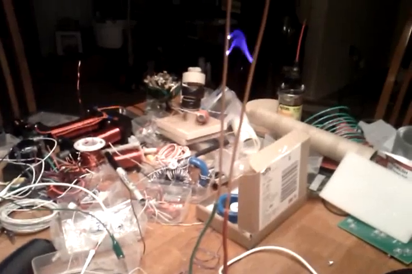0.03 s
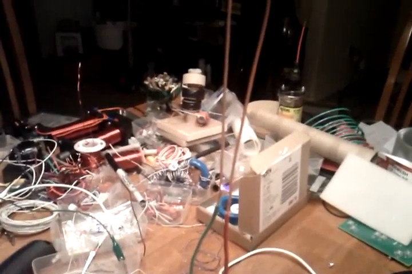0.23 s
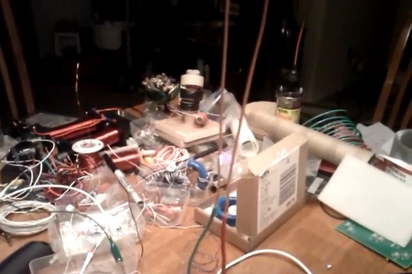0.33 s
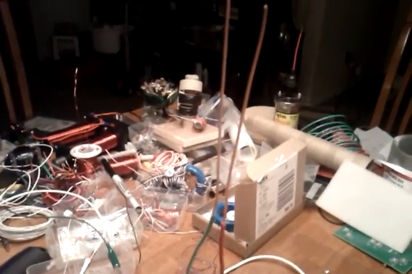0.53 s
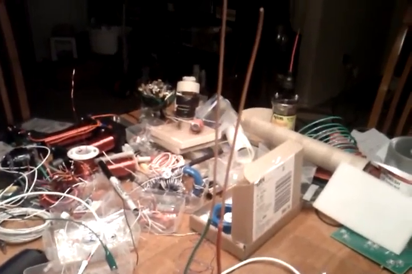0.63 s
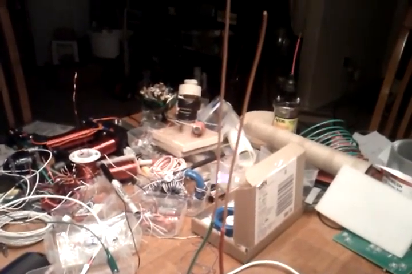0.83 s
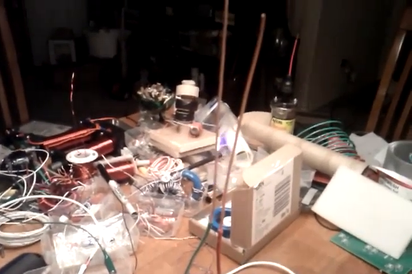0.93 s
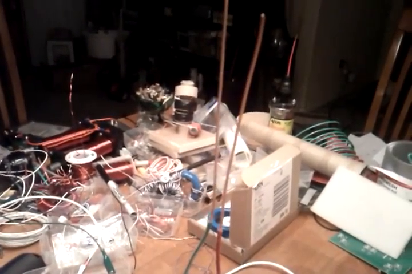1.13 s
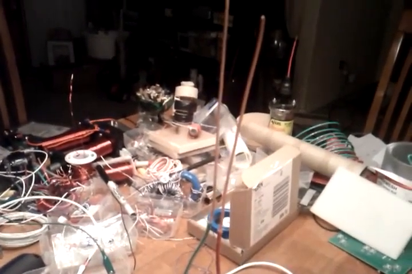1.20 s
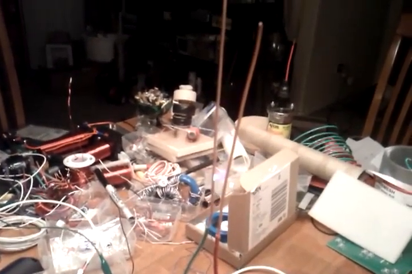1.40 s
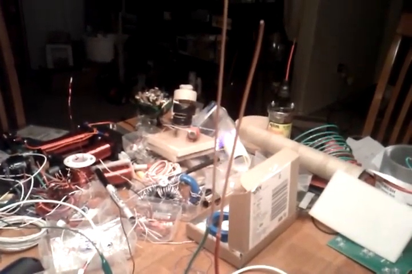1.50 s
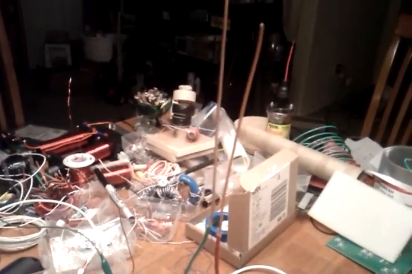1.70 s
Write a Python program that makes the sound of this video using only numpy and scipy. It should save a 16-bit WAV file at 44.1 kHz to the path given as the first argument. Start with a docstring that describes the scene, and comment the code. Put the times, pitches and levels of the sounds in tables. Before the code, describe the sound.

An electric arc between metal rods hisses and buzzes in four short bursts. Each swells and breaks off with a crack or sputter, then a loud snap restarts it. Faint hum lies underneath, in a small room.

```python
"""Climbing high-voltage arc

An arc climbs two diverging rods on a workbench, again and again. It strikes with a snap, hisses and
buzzes at twice the mains rate, flares and cracks as it tears off at the top, and strikes anew.
The supply hums throughout; bench clutter and a small room echo the snaps."""
import sys
import numpy as np
from scipy import signal
from scipy.fft import rfft, irfft
from scipy.io import wavfile
from scipy.ndimage import uniform_filter1d

SR = 44100
rng = np.random.default_rng(int(sys.argv[2]) if len(sys.argv) > 2 else 0)


def wav_out(sig):
    """Save sig, one row per channel (or a flat mono array), as 16-bit PCM at SR to the path in sys.argv[1]."""
    wavfile.write(sys.argv[1], SR, np.round(np.clip(np.atleast_2d(sig).T, -1, 1) * 32767).astype(np.int16))


N = 77175
BUZZ_HZ = 120.3  # twice mains
SCATTER_T60_S = 0.045
# arc burns: (strike [s], break [s], base hiss [dB], flare before break [dB])
BURNS = [(-.12, 0.215, -41, 13), (0.386, 0.676, -44, 9), (0.909, 1.259, -44.5, 9), (1.454, 1.892, -45, 17)]


def undb(db):
    """dB to amplitude."""
    return 10 ** (np.asarray(db) / 20)


def unit(x):
    """Scale to rms 1."""
    return x / np.sqrt(np.mean(x ** 2))


def colour(x, spectrum):
    """Filter by (frequency [Hz], gain [dB]) points."""
    hz, db = np.array(spectrum).T
    bins_hz = np.maximum(np.fft.rfftfreq(2 * N, 1 / SR), 1)
    gain = undb(np.interp(np.log(bins_hz), np.log(hz), db))
    return irfft(rfft(x, 2 * N) * gain)[:N]


def walk(rate_hz):
    """Smooth random drift, rms 1."""
    width = max(int(SR / rate_hz), 1)
    drift = uniform_filter1d(rng.standard_normal(N), width, mode="wrap")
    return unit(uniform_filter1d(drift, width, mode="wrap"))


def clicks(events):
    """One impulse per (time [s], level [dB])."""
    out = np.zeros(N)
    for at_s, db in events:
        out[int(np.clip(round(at_s * SR), 0, N - 1))] += undb(db)
    return out


def shocks(events, spectrum):
    """A sharp push and pull of air per spark (time [s], level [dB])."""
    return colour(-signal.hilbert(clicks(events)).imag, spectrum)


def echo(x, t60_s, onset_s=0.0008):
    """Diffuse reflections: a unit-energy noise tail that builds and decays."""
    t = np.arange(N) / SR
    build = 1 - np.exp(-(t / onset_s) ** 2)
    tail = rng.standard_normal(N) * np.exp(-np.log(1000) * t / t60_s) * build
    return signal.fftconvolve(x, tail / np.linalg.norm(tail))[:N]


def decay(elapsed_s, tau_s):
    """Exponential fall; 1 at negative times."""
    return np.exp(-np.maximum(elapsed_s, 0) / tau_s)


def burning(t, strike_s, break_s):
    """Arc gate: on at the strike, quenched fast at the break."""
    return (t >= strike_s) * decay(t - break_s, tau_s=0.003)


def room_air():
    """Steady low room noise."""
    # air spectrum: (frequency [Hz], relative level [dB])
    spectrum = [(25, -35.5), (70, -5.5), (110, -1.5), (170, 4), (300, 1), (550, 3.5), (800, 1.5),
                (1100, -1), (1400, 1.5), (1800, -5), (3500, -9), (7200, -12.5)]
    return undb(-54.5) * unit(colour(rng.standard_normal(N), spectrum))


def whines(t):
    """Faint room tones that swell and fade."""
    # whines: (frequency [Hz], top rms level [dB], centre [s], 1/e half-width [s])
    tones = [(172, -73, 0.7, 3.5), (695, -70, 0.6, 3.6), (811, -71, 1, 2.8), (1280, -70, 1, 2.4),
             (1350, -62, .36, .1), (1374, -62, 0.45, 0.23), (1505, -67, 0.46, 1.1)]
    out = np.zeros(N)
    for hz, db, centre_s, width_s in tones:
        swell = undb(db) * np.exp(-((t - centre_s) / width_s) ** 2)
        out += swell * np.sin(2 * np.pi * hz * t + 0.56 * walk(7))
    return np.sqrt(2) * out


def fan(t, hz=483.8, rms_db=-61.5):
    """Near-steady fan-like tone."""
    amplitude = np.sqrt(2) * undb(rms_db + walk(2.1))
    return amplitude * np.sin(2 * np.pi * hz * t + 0.31 * walk(6.6))


def supply_hum(cycles, waver_db=2.5):
    """Supply harmonics, each wavering in level."""
    # hum partials: (multiple of BUZZ_HZ, rms level [dB])
    partials = [(1, -72), (2, -73), (3, -72)]
    out = np.zeros(N)
    for multiple, db in partials:
        amplitude = np.sqrt(2) * undb(db + waver_db * walk(3))
        out += amplitude * np.sin(2 * np.pi * (multiple * cycles + rng.random()))
    return out


def arc_buzz(t, cycles, level_db=-63.5, waver_db=2.2, grow_s=0.05):
    """One pulse per current surge, growing as the arc stretches."""
    # buzz spectrum: (frequency [Hz], relative gain [dB])
    spectrum = [(60, -33), (120, 19), (240, 18), (360, 12.5), (700, 2), (1100, -16.5), (1550, -25),
                (2500, -47.5), (5000, -62)]
    stretch = np.zeros(N)
    for strike_s, break_s, _, _ in BURNS:
        stretch += burning(t, strike_s, break_s) * (1 - decay(t - strike_s, grow_s))
    surge_count = np.floor(cycles + 0.06 * walk(6.8))
    pulses = np.diff(surge_count, prepend=surge_count[0]) * undb(1.2 * walk(60))
    buzz = unit(colour(pulses - pulses.mean(), spectrum))
    return undb(level_db + waver_db * walk(18)) * stretch * buzz


def arc_hiss(t, cycles, crackle_per_s=56, crackle_db=-19.5):
    """Grainy hiss and tiny sparks that surge with the current and flare before each break."""
    # hiss spectrum: (frequency [Hz], relative level [dB])
    spectrum = [(80, -35), (300, -6), (800, -12), (1600, -6.5), (2400, -7.5), (3200, -3), (3900, 0.5),
                (5700, 5), (7200, -2)]
    envelope = np.zeros(N)
    for strike_s, break_s, base_db, flare_db in BURNS:
        fresh_db = 4 * decay(t - strike_s, tau_s=0.22)
        rise_db = flare_db * decay(break_s - t, tau_s=0.03)
        envelope += burning(t, strike_s, break_s) * undb(base_db + fresh_db + rise_db)
    surge = 1 + 0.18 * np.cos(2 * np.pi * cycles)
    sizzle = unit(rng.standard_normal(N) * np.exp(0.43 * walk(2500)))
    crackle = unit((rng.random(N) < crackle_per_s / SR) * rng.uniform(0.41, 1, N))
    sparks = (sizzle + undb(crackle_db) * crackle) * surge
    flutter = undb(walk(70))
    return unit(colour(sparks, spectrum)) * envelope * flutter


def tearing(spit_db=-2, scatter_db=-12.5):
    """Sputters and cracks high on the rods, far from the clutter; each crack leaves a dull ring."""
    # sputters of the stretched arc: (time [s], level [dB])
    sputters = [(.120, -11), (.6493, -6.5), (.6786, -6), (1.1784, -8.5), (1.7069, -9.5), (1.7126, -10.5)]
    # tear-off cracks: (time [s], level [dB], ring level [dB])
    cracks = [(.2111, 14.8, 0), (.2206, 17, 1), (1.2532, 14.2, 5.5)]
    # sputter, crack and ring spectra: (frequency [Hz], gain [dB])
    sputter_spectrum = [(30, -40), (80, -22), (220, -5.5), (700, -1.5), (1400, -1.5), (2500, -10),
                        (4200, -3.5), (7200, -7)]
    crack_spectrum = [(30, -56), (100, -39.5), (500, -25), (1200, -21), (2200, -22.5), (3500, -9.5),
                      (4800, -9), (6000, -4), (7200, -14.5)]
    ring_spectrum = [(80, -52), (400, -21.5), (800, -14), (1250, -3.5), (1900, -4.5), (3000, -13.5),
                     (7000, -31)]
    sputter = shocks(sputters, sputter_spectrum)
    spit = undb(spit_db) * echo(sputter, t60_s=0.03)
    crack = shocks([(at_s, db) for at_s, db, _ in cracks], crack_spectrum)
    ring_drive = shocks([(at_s, db) for at_s, _, db in cracks], ring_spectrum)
    ring = echo(ring_drive, t60_s=0.075)
    snaps = crack + sputter + spit
    return snaps + ring + undb(scatter_db) * echo(snaps, SCATTER_T60_S)


def strikes(scatter_db=-10, path_spread_s=0.00008):
    """Breakdowns of the narrow bottom gap; each jumps at a new spot, shifting the bench echoes."""
    # breakdowns: (time [s], level [dB])
    breakdowns = [(0.3851, 20.8), (0.9149, 16.8), (1.4434, 20.6)]
    # bench reflections: (delay [s], gain [dB])
    reflections = [(.00125, -12), (.0032, -15), (.00555, -17), (.0119, -19.5)]
    # spectra of the snap and the treble-reflecting clutter: (frequency [Hz], gain [dB])
    snap_spectrum = [(30, -68.5), (100, -40.5), (450, -21), (1300, -16.5), (2600, -17.5), (3400, -9),
                     (4400, -6), (4900, -2), (6300, 1), (7200, -6)]
    clutter_spectrum = [(500, -11.5), (1500, 4.5), (3000, 5), (7000, 0)]
    out = np.zeros(N)
    for breakdown in breakdowns:
        snap = shocks([breakdown], snap_spectrum)
        paths = [(delay_s + path_spread_s * rng.standard_normal(), db) for delay_s, db in reflections]
        reflected = signal.fftconvolve(snap, clicks(paths))[:N]
        scattered = undb(scatter_db) * echo(snap, SCATTER_T60_S)
        out += snap + colour(reflected + scattered, clutter_spectrum)
    return out


def scene():
    """Arc and snaps in a small room, over hum and room noise; mono."""
    t = np.arange(N) / SR
    cycles = BUZZ_HZ * t
    direct = arc_hiss(t, cycles) + arc_buzz(t, cycles) + strikes() + tearing()
    reverb = undb(-15) * echo(direct, t60_s=0.32, onset_s=0.0024)
    background = supply_hum(cycles) + fan(t) + whines(t) + room_air()
    return (direct + reverb + background)[None]


def record(dry, cutoff_hz=7520, clip_level=0.76):
    """Clip the tallest snaps between two steep low-passes."""
    lowpass = signal.butter(30, cutoff_hz, fs=SR, output="sos")
    clipped = np.clip(signal.sosfiltfilt(lowpass, dry), -clip_level, clip_level)
    return signal.sosfiltfilt(lowpass, clipped)


dry = scene()
out = record(dry)
wav_out(out)
```